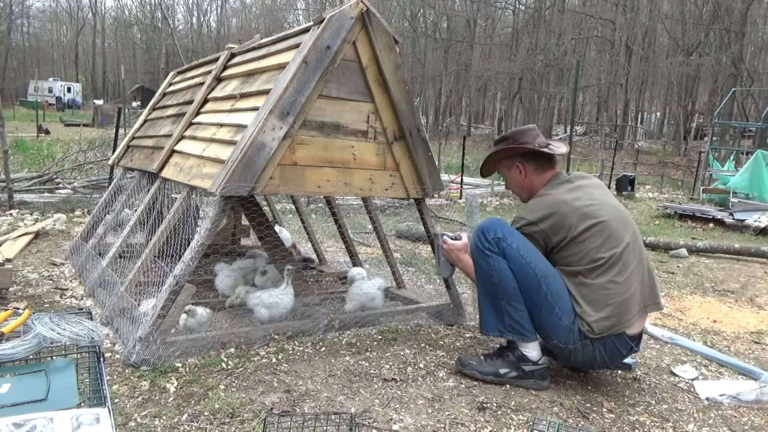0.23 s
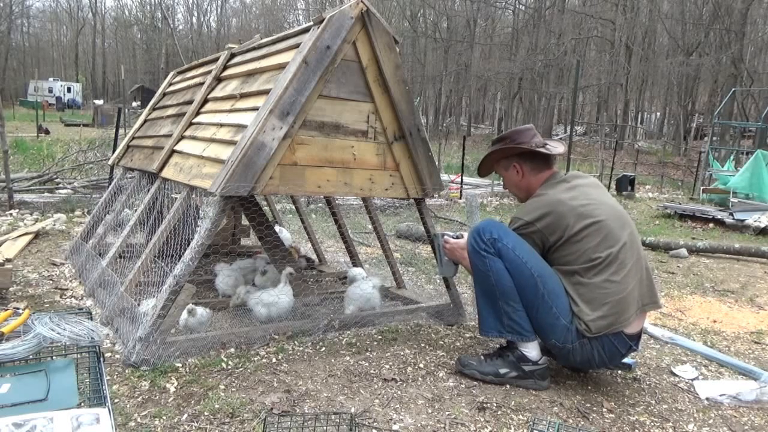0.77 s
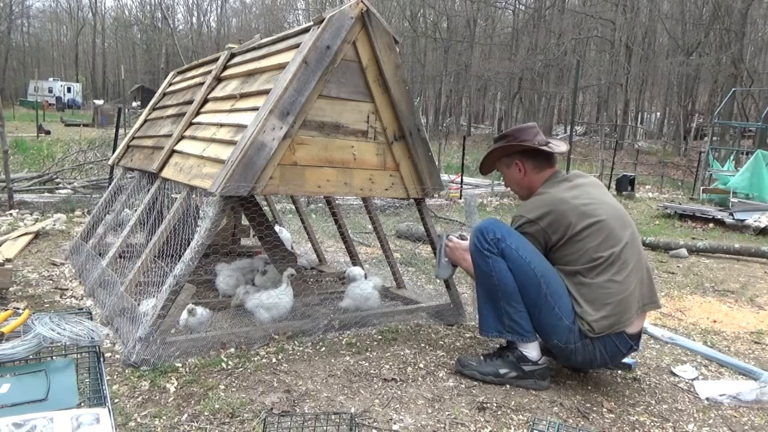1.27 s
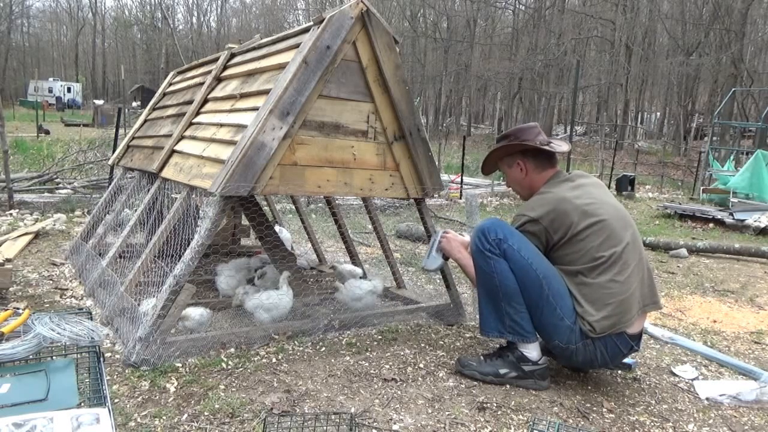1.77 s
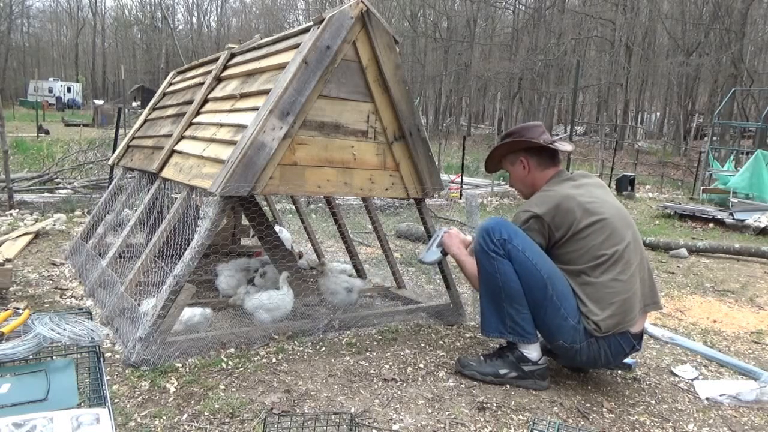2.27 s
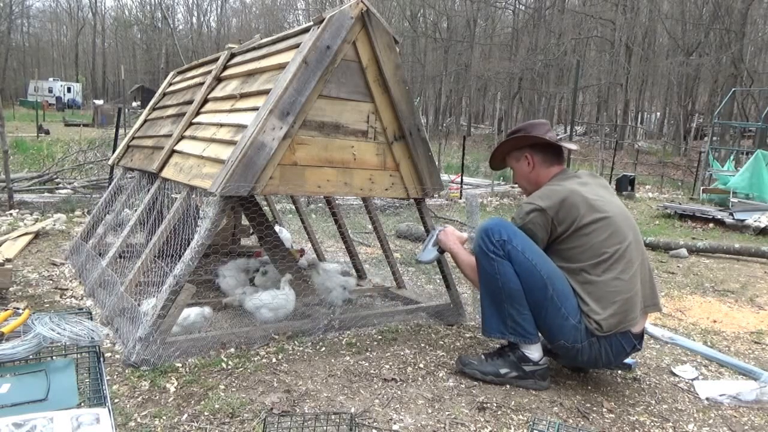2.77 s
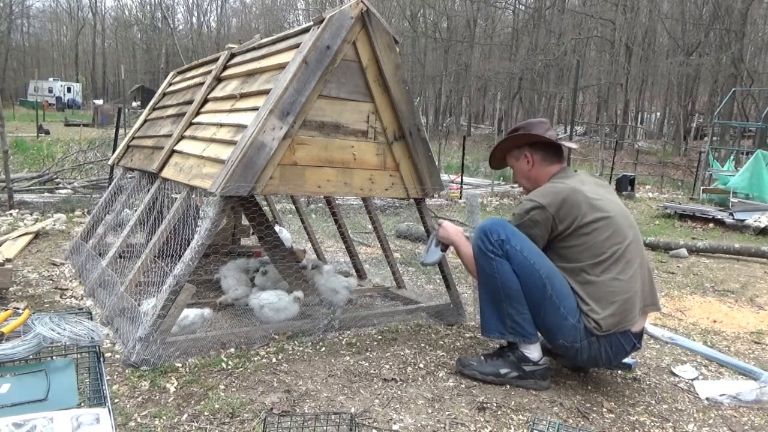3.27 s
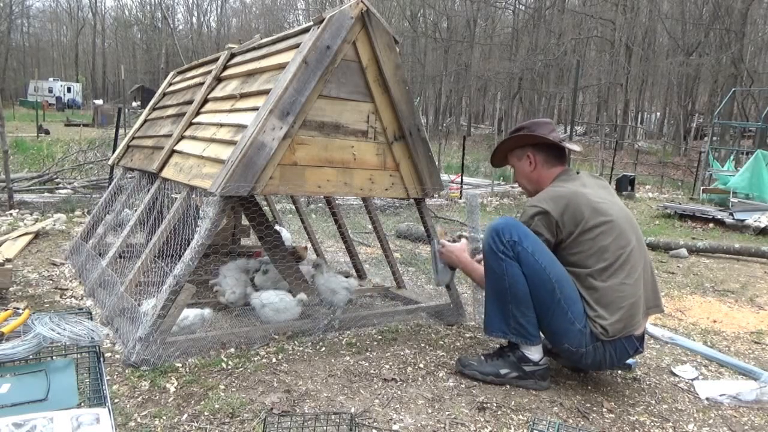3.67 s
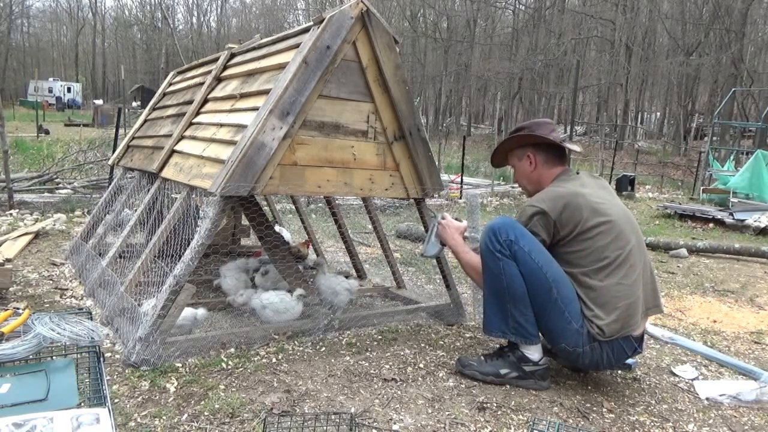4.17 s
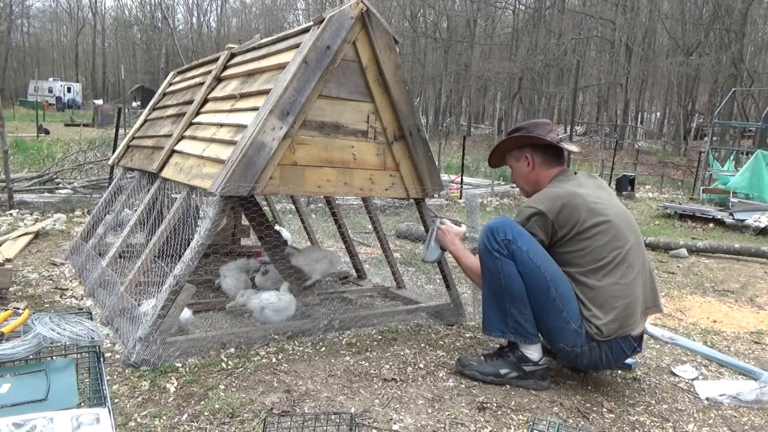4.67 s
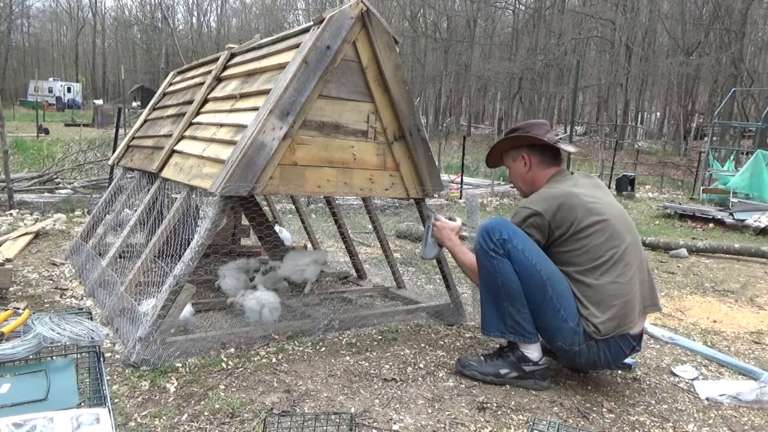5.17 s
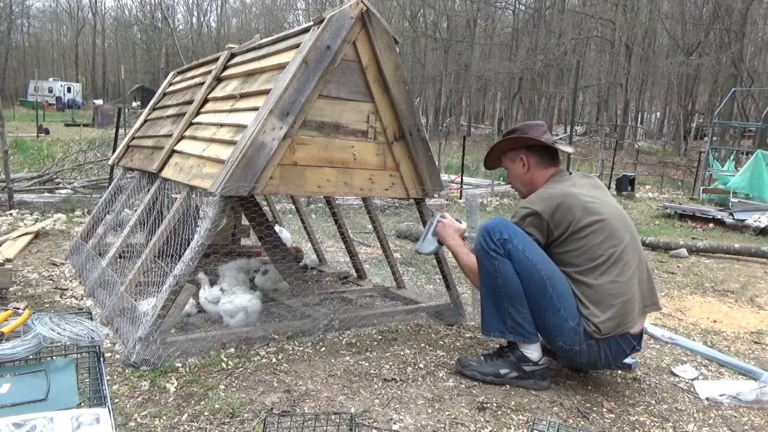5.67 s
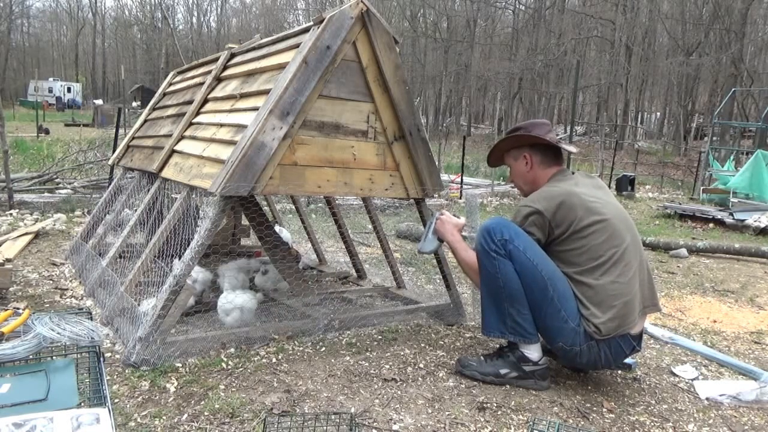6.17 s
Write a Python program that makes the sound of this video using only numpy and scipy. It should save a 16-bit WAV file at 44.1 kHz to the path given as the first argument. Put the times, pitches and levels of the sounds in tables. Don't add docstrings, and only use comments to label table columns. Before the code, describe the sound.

Light steel ticks and wire rustle lead to hard, clattering staple shots and wooden knocks, with chicks peeping and warbling in a quiet yard.

```python
import sys
import numpy as np
from scipy import signal
from scipy.fft import rfft, irfft, next_fast_len
from scipy.io import wavfile
from scipy.ndimage import uniform_filter1d, map_coordinates

SR = 44100
rng = np.random.default_rng(int(sys.argv[2]) if len(sys.argv) > 2 else 0)


def output_pcm(signal):
    pcm = np.clip(np.atleast_2d(signal).T, -1, 1) * 32767
    wavfile.write(sys.argv[1], SR, np.round(pcm).astype(np.int16))


def magnitude_from_level(level_db):
    exponent = np.asarray(level_db, float) / 20
    return 10 ** exponent


N = 283122


def unit(x):
    return x / np.sqrt(np.mean(x ** 2) + 1e-20)


def along(points, hz):
    f, v = np.transpose(points)
    return np.interp(np.log(hz + 1), np.log(f + 1), v)


def wobble(rate):
    knots = rng.standard_normal(int(N * rate / SR) + 4)
    return map_coordinates(knots, [np.arange(N) * rate / SR])


def filtered(x, response):
    m = next_fast_len(x.shape[-1] + 8192)
    spectrum = rfft(x, m) * response(np.fft.rfftfreq(m, 1 / SR))
    return irfft(spectrum, m)[..., :x.shape[-1]]


def modes(table, spread_db=0):
    def response(f):
        total = 0
        for k, (centre, width, db) in enumerate(table):
            strength = (-1) ** k * magnitude_from_level(db + spread_db * rng.normal())
            total = total + strength * 1j * f * width / (centre * centre - f * f + 1j * f * width)
        return total / np.sqrt(np.mean(abs(total) ** 2))
    return response


def add(out, s, x):
    part = out[round(s * SR):][:len(x)]
    part += x[:len(part)]


def burst(t60, rise_s, length_s, uneven_db=0):
    t = np.arange(round(length_s * SR)) / SR
    shape = magnitude_from_level(-60 * t / max(t60, .008)) * (1 - np.exp(-t / rise_s))
    sizes = np.repeat(rng.standard_normal(len(t) // 25 + 1), 25)[:len(t)]
    noise = rng.standard_normal(len(t)) * magnitude_from_level(uneven_db * sizes) * shape
    return noise * np.linalg.norm(shape) / np.linalg.norm(noise)


def rung(push, response):
    ring = filtered(push, response)
    return ring * np.linalg.norm(push) / np.linalg.norm(ring)


# f [Hz], level [dB per Hz]
WIND_COLOUR = [(12, -41), (20, -16), (156, -3.5), (189, -8), (224, -5.5), (372, -9.5), (440, -7), (506, -8),
               (566, -7), (3060, -16), (3620, -19.5), (9000, -23), (12500, -24.5), (15200, -23.5),
               (16500, -66)]
# f [Hz], likeness [0 to 1]
WIND_LIKENESS = [(60, 1), (240, 0.82), (950, 0.34), (3770, 0.2), (15000, 0.024)]


def hush():
    z = signal.stft(rng.standard_normal((2, N)), nperseg=512)[2]
    patches = uniform_filter1d(rng.standard_normal(z.shape[1:]), 6, 0)
    patches = uniform_filter1d(patches, 14, 1)
    pair = signal.istft(z * magnitude_from_level(.9 * unit(patches)), nperseg=512)[1][:, :N]

    def mid_side(hz):
        turn = np.arccos(np.clip(along(WIND_LIKENESS, hz), -1, 1)) / 2
        return magnitude_from_level(along(WIND_COLOUR, hz)) * [np.cos(turn), np.sin(turn)]

    mid, side = filtered(pair, mid_side)
    gusts = magnitude_from_level(-56.0 + 0.11 * wobble(0.91))
    return gusts * unit(np.array([mid + side, mid - side]))


# f [Hz], t60 [s]
YARD_TAIL = [(300, 0.13), (3000, 0.29), (12000, 0.047)]


def yard(x):
    hz, t, z = signal.stft(rng.standard_normal((2, SR // 2)), SR, nperseg=256)
    fade = magnitude_from_level(-60 * t / along(YARD_TAIL, hz)[:, None])
    tail = signal.istft(z * fade, SR, nperseg=256)[1]
    late = np.pad(x, (150, 0))
    return signal.fftconvolve(late[None], tail / np.linalg.norm(tail[0]), axes=1)[:, :N]


def scatter(x):
    tails = np.array([burst(t60=.014, rise_s=.001, length_s=.05) for port in range(2)])
    echo = signal.fftconvolve(x[None], tails / np.linalg.norm(tails[0]), axes=1)[:, :N]
    return magnitude_from_level(-9) * filtered(echo, lambda f: 1j * f / (2500 + 1j * f))


def sung(rows, top, knee, curl, crest, start_db, end_db):
    u, crest = np.linspace(0, 1, num=17), np.clip(crest, .05, .95)
    height = np.exp(-((u - top) / knee) ** 2) + curl * u ** 3
    rise_db = start_db * (1 - u / crest) ** 2
    fall_db = end_db * ((u - crest) / (1 - crest)) ** 2
    loss_db = np.where(u < crest, rise_db, fall_db)
    return [np.transpose([s + u * length, held + (first - held) * height, db - loss_db])
            for s, length, first, held, db in rows]


def warbled(rows, hold=1):
    u = np.linspace(-.5, .5, num=13)
    arch = np.sin(np.pi * u) ** 2
    return [np.transpose([s + u * length, low + (ends - low) * arch ** 2, db - 14 * arch ** hold])
            for s, length, low, ends, db in rows]


def voice(notes, orders, throat, flutter_db, waver, overtone_db=0):
    out, drift = np.zeros(N), wobble(150)
    flutter = np.tanh(.3 * wobble(55) + .6 * wobble(110) + wobble(500))
    for rows in notes:
        s, hz, db = np.transpose(rows)
        t = np.arange(round(s[0] * SR), round(s[-1] * SR))
        pitch = uniform_filter1d(np.interp(t / SR, s, hz), size=150) * (1 + waver * drift[t])
        phase = 2 * np.pi * np.cumsum(pitch) / SR
        tone = np.sin(phase)
        for k in orders:
            weak_db = -5 * (k % 1 > 0) - 7 * (k == 3)
            tone = tone + magnitude_from_level(overtone_db + weak_db + along(throat, k * pitch)) * np.sin(k * phase)
        swell_db = uniform_filter1d(np.interp(t / SR, s, db), size=150) + 5.0 + flutter_db * flutter[t]
        out[t] += magnitude_from_level(swell_db) * signal.windows.tukey(len(t), .12) * tone
    return out


# f [Hz], level [dB]
BEAK_COLOUR = [(4000, -24), (4700, -14), (5100, -13), (5500, -17), (6300, -20), (8000, -29), (15000, -40)]
# f [Hz], level [dB]
THROAT_COLOUR = [(450, -16), (1350, -8), (1850, -3), (2150, -18), (2450, -9), (2650, -11), (2900, -22),
                 (3600, -21), (4700, -20), (6000, -30)]
# start t [s], length [s], first f [Hz], held f [Hz], level [dB]
DROPPING_PEEPS = [
    (2.44, 0.066, 5100, 3150, -61.5),
    (3.027, 0.044, 3700, 2620, -45.5),
    (4.398, 0.053, 3900, 2530, -48),
    (5.121, 0.061, 4150, 2615, -42.5),
    (6.344, 0.04, 4100, 3110, -55),
]
DROP = dict(top=0.0087, knee=.36, curl=-0.034, crest=0.49, start_db=22, end_db=16)
# start t [s], length [s], first f [Hz], last f [Hz], level [dB]
PEEP_FLICKS = [
    (2.497, .018, 3290, 2800, -66),
    (3.015, .015, 2970, 3720, -64),
    (3.069, 0.023, 2670, 2750, -47.5),
    (3.792, 0.025, 3850, 3910, -54.5),
    (5.112, 0.015, 3410, 4150, -59),
    (6.378, 0.019, 3200, 2500, -58),
]
FLICK = dict(top=0.05, knee=0.437, curl=.01, crest=0.47, start_db=5, end_db=17)
# start t [s], length [s], first f [Hz], aim f [Hz], level [dB]
SLIDING_PEEPS = [
    (1.2, 0.025, 4000, 3150, -63),
    (1.385, .03, 4600, 3400, -70),
    (2.685, .027, 4150, 3450, -67),
]
SLIDE = dict(top=0.0061, knee=0.87, curl=0.0075, crest=0.53, start_db=17, end_db=14)
# start t [s], length [s], first f [Hz], lowest f [Hz], level [dB]
HOOKED_PEEPS = [
    (3.64, .048, 3000, 2046, -44.5),
]
HOOK = dict(top=0.079, knee=.36, curl=0.62, crest=0.36, start_db=13, end_db=10)
# t [s], f [Hz], level [dB]
SWOOPING_PEEPS = [
    [(.66, 3350, -56), (.672, 3060, -49), (.685, 2620, -51), (.696, 2484, -47), (.71, 2650, -50),
     (.724, 2920, -57)],
    [(6.043, 4250, -62), (6.06, 3750, -56), (6.08, 3150, -43), (6.093, 2610, -55), (6.104, 2310, -53),
     (6.123, 2300, -59)],
    [(3.806, 3660, -55), (3.82, 3070, -53), (3.836, 2890, -43), (3.848, 2760, -49), (3.86, 2350, -60.5)],
    [(5.902, 4270, -60), (5.915, 3750, -53), (5.927, 3150, -46), (5.943, 2600, -45), (5.96, 2365, -48.5),
     (5.985, 2380, -57)],
    [(2.802, 1980, -55), (2.817, 2395, -45.5), (2.834, 2125, -46), (2.85, 2057, -47.5), (2.865, 2106, -53),
     (2.878, 2150, -60)],
]
# t [s], f [Hz], level [dB]
SHRILL_PEEP = [
    [(2.094, 3560, -67), (2.115, 3330, -57), (2.138, 3050, -50), (2.15, 2700, -57), (2.17, 2330, -66)],
]
# t [s], f [Hz], level [dB]
ARCHED_PEEPS = [
    [(6.084, 2760, -61), (6.096, 2870, -47.5), (6.112, 3050, -57), (6.122, 2600, -59), (6.132, 2230, -56)],
    [(6.2, 2600, -56), (6.21, 2900, -46.5), (6.219, 3600, -54), (6.229, 4130, -54), (6.24, 2900, -53),
     (6.253, 2300, -52)],
]
# t [s], f [Hz], level [dB]
COO_LINK = [
    [(5.82, 1050, -53), (5.828, 1600, -52), (5.839, 1390, -52), (5.852, 1253, -45.5), (5.862, 1416, -55),
     (5.871, 1710, -54), (5.88, 1000, -46)],
]
# t [s], f [Hz], level [dB]
HEN_CROONS = [
    [(4.9, 225, -67), (4.925, 223, -55.5), (4.96, 220, -69)],
    [(6.165, 240, -62), (6.19, 237, -59), (6.22, 237, -60), (6.24, 232, -68)],
]
# start t [s], length [s], top f [Hz], foot f [Hz], level [dB]
RASPING_PEEP = [
    (5.495, .08, 3147, 2300, -48),
]
RASPING = dict(top=0.295, knee=0.43, curl=0.0088, crest=0.77, start_db=5, end_db=7)
# start t [s], length [s], first f [Hz], held f [Hz], level [dB]
GLIDING_NOTES = [
    (3.932, 0.022, 1056, 705, -52),
    (5.142, 0.049, 1804, 943, -44.5),
    (5.596, 0.021, 1376, 970, -48),
]
GLIDE = dict(top=0.033, knee=.42, curl=0.066, crest=1, start_db=4, end_db=14)
# start t [s], length [s], first f [Hz], held f [Hz], level [dB]
HOVERING_NOTES = [
    (5.466, 0.042, 1595, 1253, -45.5),
    (5.531, 0.0403, 1504, 1288, -46),
]
HOVER = dict(top=0.009, knee=0.203, curl=0.096, crest=0.53, start_db=11, end_db=1)
# middle t [s], length [s], lowest f [Hz], f at both ends [Hz], level [dB]
DIPPING_NOTES = [
    (5.519, 0.03, 1130, 1380, -42),
    (5.582, 0.027, 1103, 1360, -40.5),
]
# middle t [s], length [s], lowest f [Hz], f at both ends [Hz], level [dB]
WARBLE_NOTES = [(2.031, 0.02, 915, 1000, -45), (4.654, 0.021, 887, 1050, -36.5),
                (4.671, 0.016, 815, 885, -54), (4.91, 0.044, 920, 1386, -41),
                (4.947, 0.051, 1042, 1438, -41), (4.985, 0.035, 917, 1475, -39.5),
                (5.021, 0.041, 926, 1420, -39), (5.052, .03, 997, 1320, -41.5),
                (5.399, 0.044, 1067, 1574, -38), (5.441, 0.038, 1157, 1625, -37.5),
                (5.461, .014, 1720, 1610, -44)]
# middle t [s], length [s], lowest f [Hz], f at both ends [Hz], level [dB]
COO_NOTES = [
    (5.13, 0.027, 1000, 1160, -40.5),
    (5.809, 0.033, 963, 1055, -45),
    (5.892, 0.034, 920, 1050, -41),
]
# start t [s], length [s], first f [Hz], held f [Hz], level [dB]
HOARSE_NOTES = [
    (2.191, 0.032, 1015, 843, -43.5),
    (2.222, 0.016, 910, 918, -48),
    (2.389, 0.036, 1052, 823, -44.5),
    (2.548, 0.062, 993, 854, -47.5),
    (4.854, 0.027, 1002, 850, -37),
    (5.344, 0.031, 1048, 860, -38),
]
CROAK = dict(top=0.011, knee=0.162, curl=0.82, crest=0.12, start_db=13, end_db=12)
# start t [s], length [s], first f [Hz], held f [Hz], level [dB]
LOW_CLUCKS = [
    (4.452, 0.022, 570, 518, -50),
    (4.55, 0.022, 600, 503, -51.5),
]
CLUCK = dict(top=.03, knee=0.45, curl=.01, crest=0.57, start_db=11, end_db=6)


def chickens():
    beak, throat = BEAK_COLOUR, THROAT_COLOUR
    whistles = sung(DROPPING_PEEPS, **DROP) + sung(PEEP_FLICKS, **FLICK) + sung(SLIDING_PEEPS, **SLIDE)
    whistles += sung(HOOKED_PEEPS, **HOOK) + SWOOPING_PEEPS
    peeps = voice(whistles, [2], beak, flutter_db=5.5, waver=.013)
    peeps += voice(SHRILL_PEEP, [3], beak, flutter_db=4, waver=.007, overtone_db=20)
    peeps += voice(ARCHED_PEEPS, [], beak, flutter_db=7, waver=.02)
    peeps += voice(sung(RASPING_PEEP, **RASPING), [], beak, flutter_db=7, waver=.04)

    throaty = voice(COO_LINK, [2], throat, flutter_db=2, waver=.012, overtone_db=9)
    throaty += voice(HEN_CROONS, [], throat, flutter_db=2, waver=.02)
    trills = sung(GLIDING_NOTES[1:], **GLIDE) + sung(HOVERING_NOTES, **HOVER) + warbled(DIPPING_NOTES)
    throaty += voice(trills, [2, 3], throat, flutter_db=2.2, waver=.018, overtone_db=5)
    throaty += voice(warbled(WARBLE_NOTES), [2, 3], throat, flutter_db=1.6, waver=.01)
    coos = warbled(COO_NOTES, hold=3) + sung(GLIDING_NOTES[:1], **CLUCK)
    throaty += voice(coos, [2, 3], throat, flutter_db=.6, waver=.006, overtone_db=-16)
    croak_orders = [.5, 1.5, 2, 2.5, 3, 3.5, 4, 5, 5.5, 6]
    throaty += voice(sung(HOARSE_NOTES, **CROAK), croak_orders, throat, flutter_db=2, waver=.01, overtone_db=-2)
    throaty += voice(sung(LOW_CLUCKS, **CLUCK), range(2, 5), throat, flutter_db=1.5, waver=.015, overtone_db=11)

    off_roof = magnitude_from_level(-12) * np.roll(peeps, round(.0085 * SR))
    return peeps + throaty + off_roof


# peak t [s], level [dB], time to lose 20 dB [s], dull part [relative dB]
MESH_JOLTS = [(.875, -59, 0.01, 13), (1.81, -58.5, 1, 5), (2.559, -49.5, 0.09, 5), (2.66, -62.5, 1.5, 5.5),
              (3.31, -54, 0.7, 10.5), (3.4, -32, 0.27, -6.5), (3.7, -61, 0.95, -3), (4.62, -63.5, 1, 9),
              (5.147, -55, 0.6, -10), (5.34, -63.5, 1.2, 10.5), (5.79, -57.5, 0.2, -3.5),
              (6.308, -55.5, 0.2, 6.5)]
JOLT_RISE_S = 0.027
# peak t [s], level [dB], time to gain 20 dB [s], dull part [relative dB]
MESH_DRAGS = [(.36, -81, 7, 4), (.445, -55, 0.42, 7), (1.43, -69, 1.26, 11), (1.92, -52, 0.07, 8.5),
              (2.1, -60, 0.18, 9), (2.599, -41, -0.0269, 8), (3.5, -36.5, 0.03, -11),
              (3.88, -60.5, 0.9, 4.5), (4.2, -58.5, 0.2, -1), (4.408, -50, 0.07, -18),
              (4.501, -49.5, 0.12, 10.5), (4.81, -57, 0.4, 9.5), (5.225, -44, 0.1135, 9),
              (6.03, -53.5, 0.3, 4.5)]
DRAG_FADE = 0.73
# f [Hz], width [Hz], level [dB]
WIRE_MODES = [(3400, 1340, 4), (4580, 1400, 0), (7200, 3400, -6.5), (10500, 5000, 0)]


def mesh():
    moves = [(s, db, JOLT_RISE_S, fall, dull) for s, db, fall, dull in MESH_JOLTS]
    moves += [(s, db, rise, DRAG_FADE * rise, dull) for s, db, rise, dull in MESH_DRAGS]
    s, db, rise, fall, dull_db = np.transpose(moves)[:, :, None]
    t = np.arange(0, N + 64, step=64) / SR
    swell_db = db - 20 * np.maximum((s - t) / rise, (t - s) / fall)

    def level(part_db):
        return np.interp(np.arange(N) / SR, t, np.linalg.norm(magnitude_from_level(part_db), axis=0))

    def wire(f):
        return np.sqrt(sum(abs(modes([row])(f) * magnitude_from_level(row[2])) ** 2 for row in WIRE_MODES))

    clumps = magnitude_from_level(1.3 * wobble(45) + 3 * np.tanh(wobble(260)) + 2.5 * wobble(1500))
    bright = unit(filtered(clumps * rng.standard_normal(N), wire))
    dull = unit(filtered(clumps * rng.standard_normal(N), modes(BODY_MODES + SLAT_MODES)))
    return level(swell_db + .5) * bright + level(swell_db + dull_db - 2.5) * dull


# t [s], peak level [dB], t60 [s], f at the spot struck [Hz]
SLAT_KNOCKS = [
    (0.923, -46, 0.05, 860),
    (2.611, -38, 0.024, 1000),
    (3.363, -28, 0.13, 860),
    (4.473, -50, 0.059, 860),
    (5.2342, -18, 0.0078, 1200),
    (5.238, -14, 0.03, 800),
    (5.2425, -21.5, 0.038, 830),
    (6.298, -43.5, 0.035, 860),
]
# f [Hz], width [Hz], level [dB]
SLAT_MODES = [(860, 149, 5), (1176, 300, -5), (1472, 126, -0.5), (652, 510, -3)]
# t [s], peak level [dB], f of the loudest board [Hz]
FRAME_THUDS = [(0.447, -44.5, 176), (0.879, -40.5, 162), (1.897, -44.5, 154), (2.05, -45.5, 180),
               (2.593, -34.5, 131), (3.36, -27, 202), (3.384, -35, 236), (3.536, -40.5, 126),
               (4.478, -43.5, 156), (4.923, -41, 225), (5.21, -30.5, 146), (5.236, -32, 402),
               (4.931, -53, 354), (6.016, -46.5, 131), (6.174, -47, 237)]
# f [Hz], width [Hz], level [dB]
FRAME_MODES = [(96, 91, 0), (156, 72, 0), (236, 131, 0)]


def wood():
    out = np.zeros(N)
    for s, db, t60, hz in SLAT_KNOCKS:
        slat = modes([(hz, 220, 5)] + SLAT_MODES, spread_db=7.0)
        add(out, s, magnitude_from_level(db - 1.0) * rung(burst(t60, rise_s=0.00012, length_s=.2), slat))
    for s, db, hz in FRAME_THUDS:
        boards = modes(FRAME_MODES + [(hz, 40, 4)], spread_db=3.0)
        shove = burst(0.39, rise_s=0.003, length_s=.6)
        thud = rung(shove, lambda f: boards(f) * (1j * f / (55 + 1j * f)) ** 4)
        add(out, s, magnitude_from_level(db - 6.5) * thud)
    return out


# t [s], level [dB], f [Hz], t60 [s]
PART_RINGS = [(0.4225, -40.5, 1410, 0.079), (0.65, -39, 1600, 0.025), (0.7, -49, 1600, 0.027),
              (3.3023, -37.5, 1400, 0.055), (1.8679, -45, 2270, 0.13), (1.8963, -43, 3300, 0.058),
              (1.896, -36, 10000, .04), (1.8963, -33.5, 5200, 0.034), (2.044, -35, 3050, 0.057),
              (2.0438, -38.5, 5200, 0.046), (2.628, -32, 10100, 0.091), (3.3755, -20, 9400, 0.03),
              (3.414, -30.5, 1580, 0.033), (3.4802, -27, 4750, 0.062), (3.5355, -33, 3470, .05),
              (3.541, -31, 7300, .05), (3.6455, -29, 10000, 0.052), (4.4735, -36, 11500, .04),
              (5.184, -36, 8600, .025), (5.2132, -21, 10900, 0.022), (5.236, -30, 18000, .02),
              (5.2601, -35.5, 10200, 0.1), (5.2601, -27, 4400, 0.042), (5.2601, -28.5, 2320, 0.057),
              (6.3, -44, 3700, 0.042), (6.1983, -48, 4600, 0.037), (3.658, -32, 2410, .03),
              (3.655, -33, 1600, 0.036), (3.538, -36, 1300, .08), (6.297, -44, 1850, 0.038),
              (4.477, -42, 2600, .04), (4.3, -46, 880, .04), (4.607, -44, 1100, 0.052),
              (6.012, -41.5, 2600, 0.051), (.8895, -44, 1900, 0.033)]


def rings():
    out = np.zeros(N)
    for s, db, hz, t60 in PART_RINGS:
        part = modes([(hz, hz / 30, 0)])
        add(out, s, magnitude_from_level(db) * rung(burst(t60, rise_s=0.00029, length_s=.2), part))
    return out


# t [s], bright peak level [dB], gun body [relative dB], t60 [s], spring [relative dB]
DRIVER_SNAPS = [(0.4232, -30.5, -8, 0.051, -3.5), (1.8963, -27, -12, 0.033, -2),
                (2.5638, -39, -8, 0.18, -4), (2.574, -30, -8, 0.056, -6.5), (2.5872, -23, -11, 0.041, -5),
                (2.6125, -32, 7.5, 0.099, -1), (2.6205, -23, -5, 0.066, -11),
                (2.6235, -17.5, -9, 0.046, -5), (2.626, -14.5, -12, 0.035, -6),
                (2.631, -22, -3.5, 0.055, -8), (2.636, -26.5, -1, 0.036, -5.5),
                (3.3432, -10.5, -11.5, 0.033, -9.5), (3.3545, -22, -13, 0.054, -5),
                (3.356, -12, -10.5, 0.13, -8), (3.3615, -17.5, -10, .06, -3),
                (3.367, -17.5, -8, 0.086, -2.5), (3.3755, -16.5, -12, 0.17, -11),
                (3.4531, -26, -6, 0.11, -2), (3.4765, -20, -14, 0.043, -8), (3.4802, -26.5, -5, .07, -5),
                (3.5332, -20.5, -11, 0.039, -11), (3.5355, -19, -10.5, 0.066, -5),
                (3.541, -26, -8, 0.1, -4), (3.5626, -25.5, -9, 0.065, -4), (3.6294, -32, -6, 0.051, -2),
                (3.6453, -14, -18, 0.037, -2.5), (3.6515, -25, -3, 0.038, -3), (3.6555, -26, -4, 0.033, 0),
                (3.6595, -31, 1, 0.03, -2), (4.4735, -29, 7, 0.06, 1.6), (5.1795, -36.5, -4, 0.11, 1),
                (5.2136, -19, -13, 0.014, -10), (5.222, -29, 1, 0.046, -7), (5.2345, -24, 7.5, 0.027, 0),
                (5.2362, -22, 1, .02, -14), (5.243, -28, -3, 0.069, -3), (5.2585, -27, 1, 0.045, -10),
                (5.261, -24.5, -4, 0.037, -3), (5.265, -30, 6, 0.045, -7)]
# t [s], peak level [dB], gun body [relative dB]
PLACING_TICKS = [(0.303, -49, -15), (0.3533, -45, -2), (0.397, -50, 7), (.4505, -44.5, 2),
                 (0.4684, -42.5, -2), (.481, -52, 9), (0.9645, -56.5, 10), (6.005, -44, -2),
                 (0.5986, -48.5, 13), (0.6455, -39, 2.5), (0.825, -50, 0.5), (0.8818, -44, 1),
                 (0.888, -49.5, 12), (1.8, -55, -1), (1.8678, -35, -6), (2.0444, -36.5, 0.5),
                 (2.0685, -44.5, 3), (2.5993, -32, 6), (3.3026, -48, 16), (4.12, -44.5, 3.5),
                 (4.1802, -45, -4), (4.535, -36, -11), (4.591, -41.5, 0), (4.709, -46, 0),
                 (4.7797, -58, -9), (4.9157, -38.5, -2.5), (5.311, -44.5, 13.5), (5.912, -41.5, -3),
                 (6.0104, -40.5, 0), (6.198, -48.5, 4.5), (6.2876, -48.5, 6.5), (6.383, -50, 2),
                 (.877, -47.5, -6), (3.3992, -38, -13), (3.4265, -30, -8), (3.4867, -31, -6),
                 (4.4975, -45, 3), (4.5157, -46, 2), (4.6224, -52, -4), (4.7616, -50, -18),
                 (4.796, -49, -4), (5.142, -41, -16), (5.1488, -40, -12), (5.194, -40, -4), (5.3, -46, -10),
                 (5.8, -52, -10)]
TICK_T60_S = 0.069
TICK_SPRING_DB, SPRING_FOLLOWS = -1.5, 0.39
# f [Hz], width [Hz], level [dB]
STEEL_MODES = [(8020, 960, -5), (9170, 970, 2), (9680, 1260, 1), (10880, 1520, 1.5), (12800, 780, -4.5),
               (13800, 2300, -3.5)]
# f [Hz], width [Hz], level [dB]
SPRING_MODES = [(3050, 1020, 0.5), (3910, 340, 5), (4350, 710, 5), (5280, 1130, 2), (6370, 1340, -10.5)]
# f [Hz], width [Hz], level [dB]
BODY_MODES = [(1459, 410, 2.5), (1800, 330, 2.5), (2350, 390, -3.5)]


def gun():
    out = np.zeros(N)
    ticks = [(s, db, body_db, TICK_T60_S, TICK_SPRING_DB + SPRING_FOLLOWS * body_db)
             for s, db, body_db in PLACING_TICKS]

    def crack(f):
        return (1j * f / (5500 + 1j * f)) ** 2 / (1 + (f / 14600) ** 12)

    for s, db, body_db, t60, spring_db in DRIVER_SNAPS + ticks:
        rattle = burst(t60, rise_s=.0002, length_s=.15, uneven_db=2.5)
        rattle += 3 * burst(.008, rise_s=.00005, length_s=.15)
        parts = (STEEL_MODES, -8), (SPRING_MODES, spring_db - 6.5), (BODY_MODES, body_db - 9.5)
        for table, part_db in parts:
            add(out, s, magnitude_from_level(db + part_db) * rung(rattle, modes(table, spread_db=2.5)))
        add(out, s, magnitude_from_level(db - 13) * rung(rattle, crack))
    return out


# f [Hz], level [dB]
ANSWER_COLOUR = [(100, -51), (500, -5), (2000, -11), (6000, -15.5)]


def scene():
    work, birds = gun() + rings() + wood() + mesh(), chickens()
    answer = yard(magnitude_from_level(-6.5) * work + magnitude_from_level(-10.5) * birds)
    answer = filtered(answer, lambda hz: magnitude_from_level(along(ANSWER_COLOUR, hz)))
    direct = work * magnitude_from_level([[.2], [-.2]]) + birds * magnitude_from_level([[-.3], [.3]])
    return direct + answer + hush() + scatter(work)


def top_cut(x):
    return signal.sosfilt(signal.butter(12, 16820, fs=SR, output="sos"), x)


def record(dry):
    lag_s, droop_hz, top_hz = 2.5e-5, 15000, 16150

    def ports(hz):
        delay = np.exp(-1j * np.pi * hz * lag_s * np.array([[1], [-1]]))
        return delay / (1 + (hz / top_hz) ** 60) / (1 + (hz / droop_hz) ** 10)

    return top_cut(filtered(dry, ports))


dry = scene()
out = record(dry)
output_pcm(out)
```